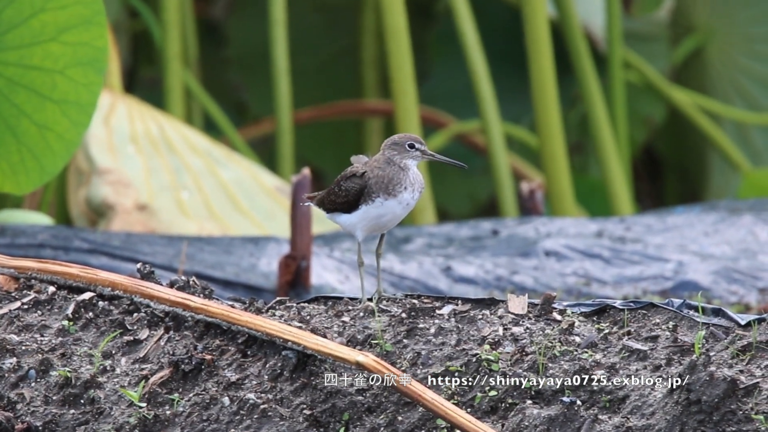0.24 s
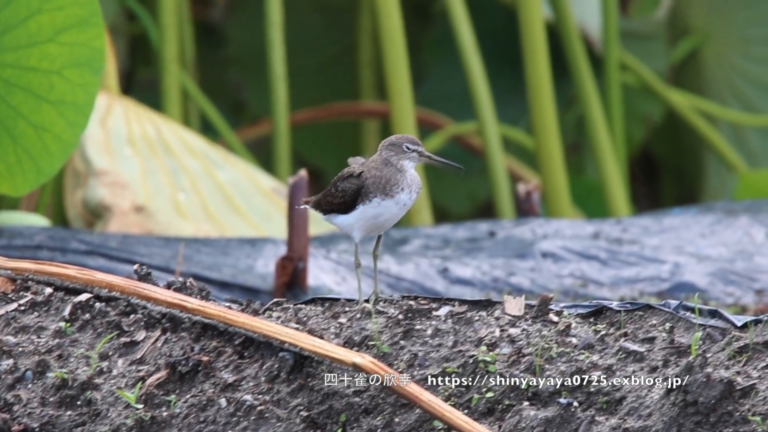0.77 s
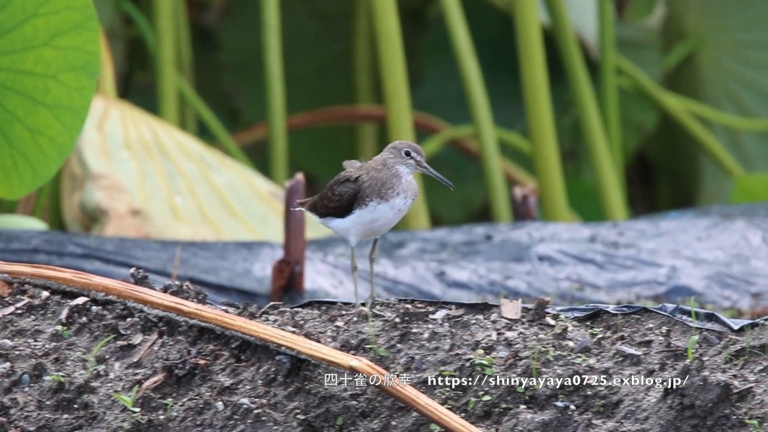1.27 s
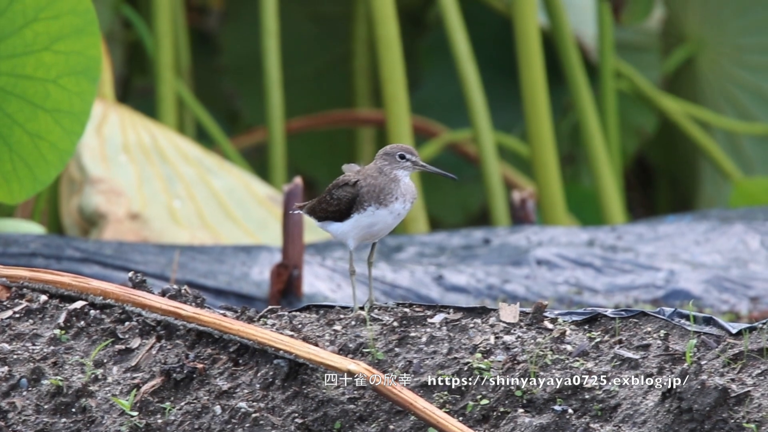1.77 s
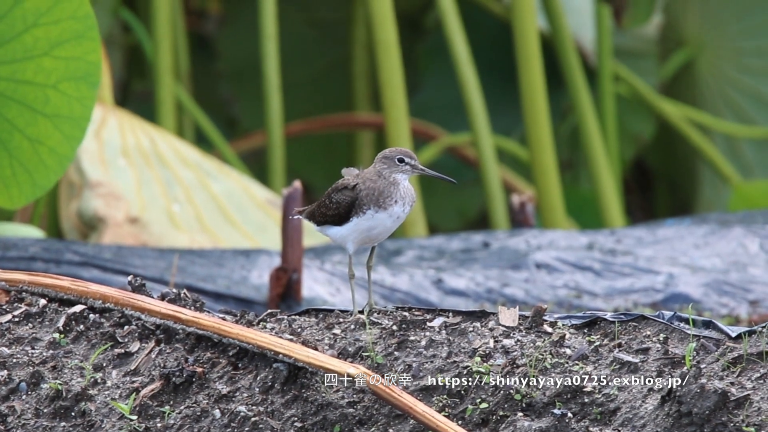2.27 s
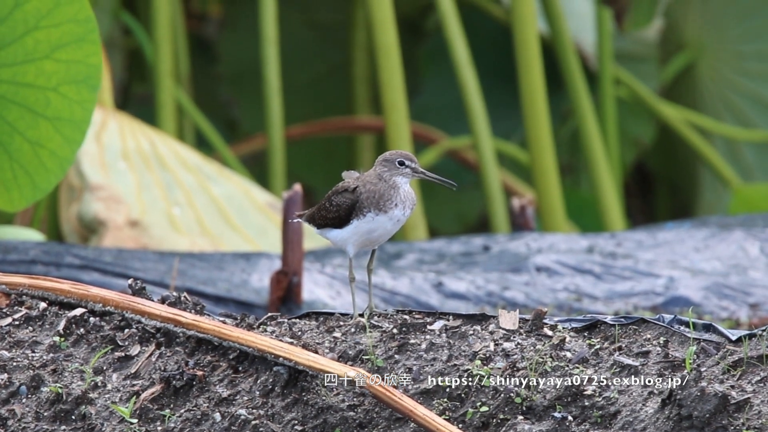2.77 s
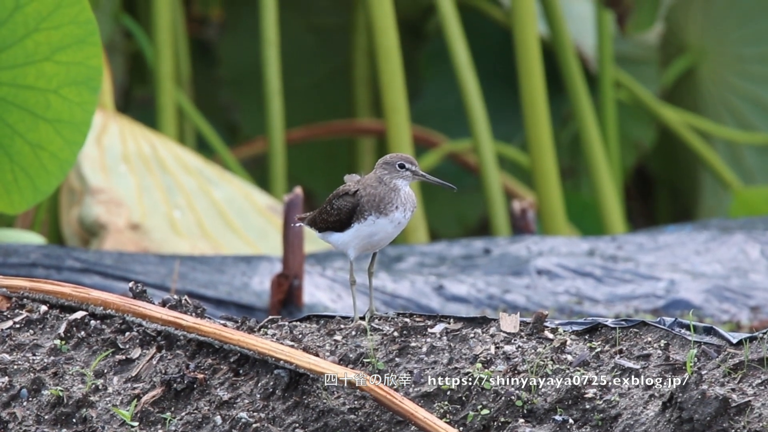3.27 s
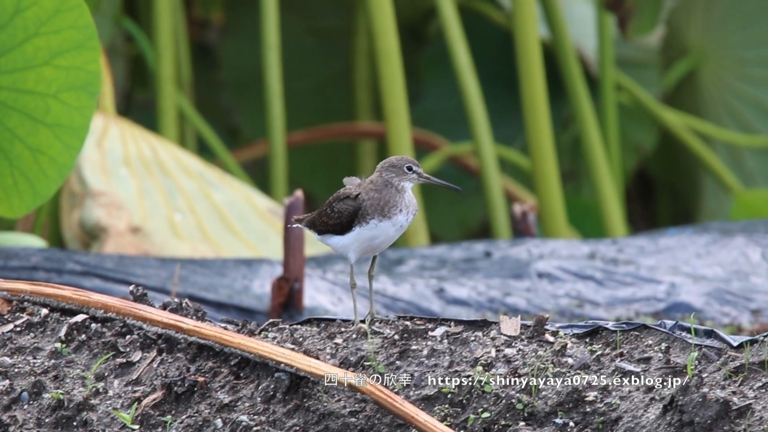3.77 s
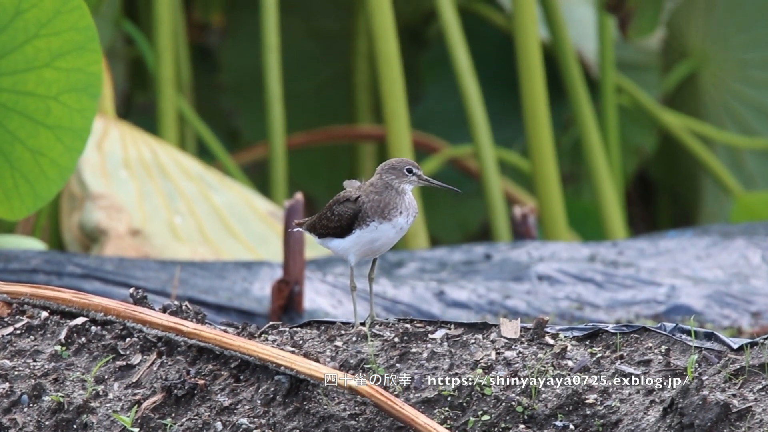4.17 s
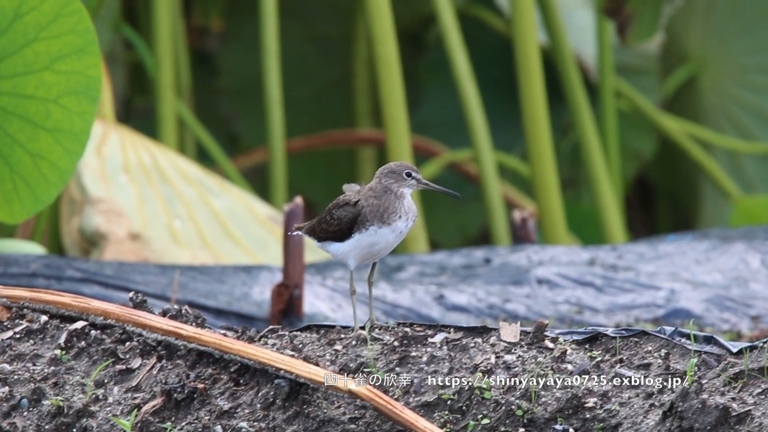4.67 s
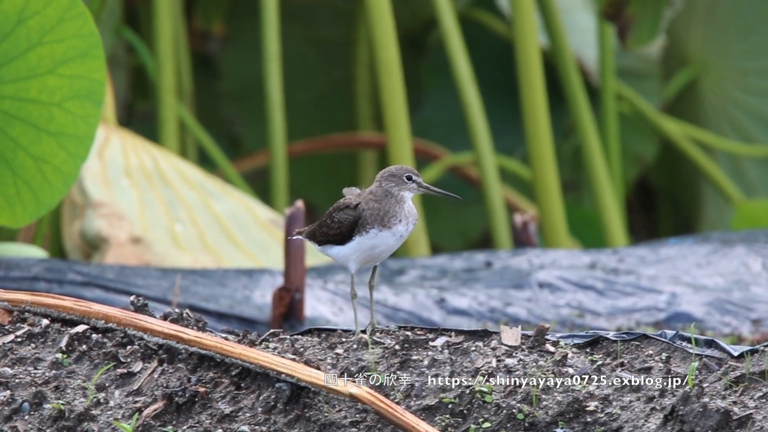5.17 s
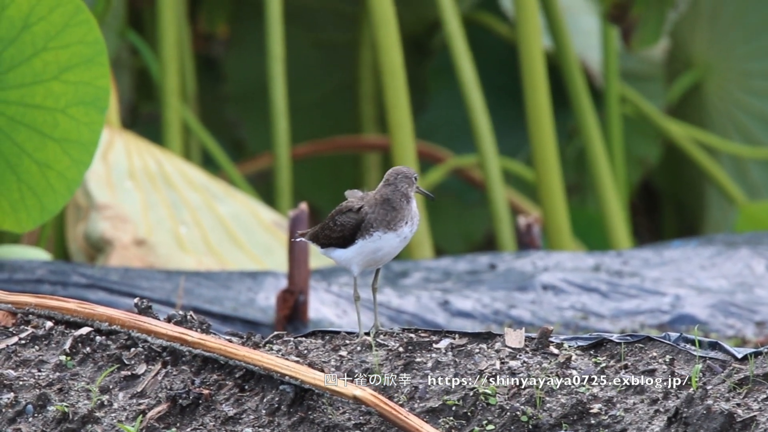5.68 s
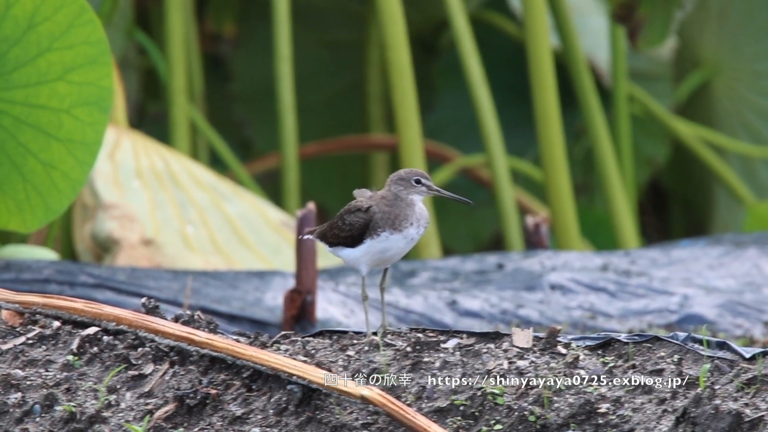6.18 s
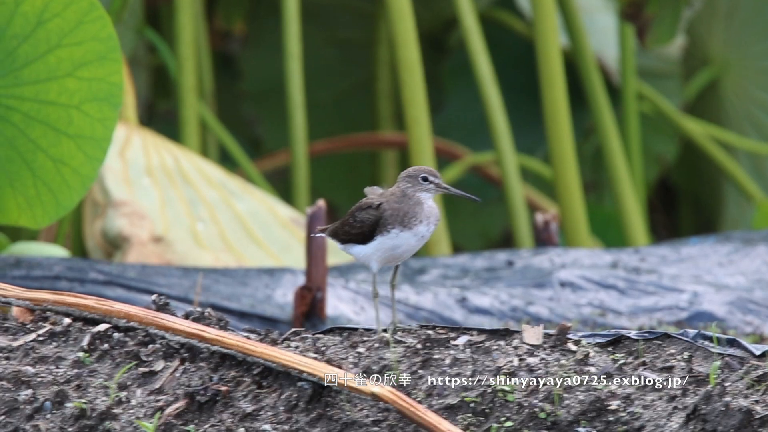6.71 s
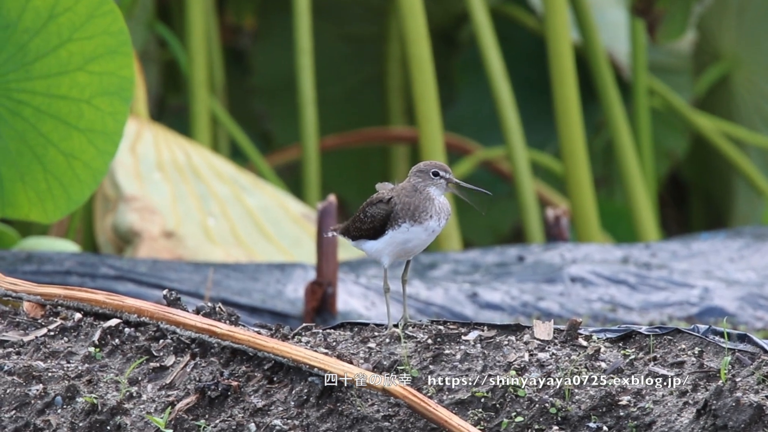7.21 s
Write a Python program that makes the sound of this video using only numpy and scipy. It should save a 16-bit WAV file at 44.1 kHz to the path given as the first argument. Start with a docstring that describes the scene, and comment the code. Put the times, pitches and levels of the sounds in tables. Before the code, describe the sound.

Sharp, evenly spaced calls from a wading bird, with distant cicadas and low, irregular wind gusts buffeting the microphone.

```python
"""A sandpiper pipes runs of sharp, arched notes at the edge of a lotus field; its throat favours
the second partial, and the stems scatter a short tail. Far off, a cicada repeats a hoarse whine
and a hiss, and a small bird twitters and buzzes once. Wind rises and buffets the microphone in
low, irregular thumps. Under it all lies a steady bed of outdoor hush, insects and faint motor hum."""
import sys
import numpy as np
from scipy import signal
from scipy.fft import rfft, irfft, next_fast_len
from scipy.io import wavfile
from scipy.ndimage import uniform_filter1d, map_coordinates

SR = 44100
rng = np.random.default_rng(int(sys.argv[2]) if len(sys.argv) > 2 else 0)


def transcribe(signal):
    """Save signal, clipped to [-1, 1], as a 16-bit WAV file at the path in sys.argv[1]."""
    frames = np.atleast_2d(signal).T
    limited = np.clip(frames, -1, 1)
    pcm = np.round(limited * 32767).astype(np.int16)
    wavfile.write(sys.argv[1], SR, pcm)


N = 328528
TOP_HZ = 15848  # band limit of the mix

# colour of the outdoor bed: f/Hz, relative level/dB
HUSH_COLOUR = [(20, -19), (47, 0), (70, -5.5), (105, -2.5), (160, -10), (290, -10.5), (780, -15),
               (3000, -21.5), (4250, -27), (5200, -26.5), (7000, -29), (11000, -38.5), (15800, -40.5)]
# stereo image of the bed: f/Hz, left-right likeness/ratio
HUSH_LIKENESS = [(60, 0.82), (180, 0.93), (550, 0.6), (1650, -0.36), (4970, -0.36), (15000, 0.11)]
# far insects singing without pause: f/Hz, width/Hz, level/dB
INSECT_BANDS = [(5230, 230, -57.5)]

# cicada phrases, cued where the whine turns to hiss: t/s, relative whine level/dB, hiss level/dB
CICADA_PHRASES = [(1.034, -42, -49), (2.39, -42, -50.5), (3.688, -40, -48.5), (5.04, -42.5, -54),
                  (6.323, -39, -48)]
# pitch bend of the whine, timed from the turn: t/s, f/Hz
WHINE_BEND = [(-.2, 2020), (-.07, 1782), (-.03, 1850), (-.018, 2150), (-.005, 2700), (.01, 2850)]
# partials of the whine: f/fundamental, relative level/dB
WHINE_PARTIALS = [(1, 3), (2, -.5)]
# pitched lines in the hiss: f/fundamental, relative level/dB
HISS_LINES = [(2, -6), (5, -4), (7, -9)]
# colour of the cicada's rasp: f/Hz, relative level/dB
RASP_COLOUR = [(2400, -20), (2900, -6), (3400, -6.5), (4500, -12), (5800, -6.5), (7300, -6), (8300, -19),
               (10000, -27)]
# colour of its hiss: f/Hz, relative level/dB
HISS_COLOUR = [(5000, -14), (7000, -11), (8600, 9), (9500, -1), (11000, -5), (13200, -1), (15800, -8)]
# more cicadas rasping further off: t/s, level/dB
CHORUS_SWELL = [(1.8, -66), (2.3, -61), (3.3, -46), (3.9, -60), (5.4, -52.5), (7.4, -53)]

# small bird's slurs: t/s, length/s, start f/Hz, middle f/Hz, end f/Hz, relative level/dB
TWITTER_SLURS = [(0.474, 0.012, 5100, 5280, 5100, -45), (0.492, .015, 3600, 4780, 4500, -39),
                 (0.513, 0.015, 3580, 4450, 4600, -38), (0.529, 0.02, 3350, 4020, 4750, -43),
                 (.595, .037, 5530, 5420, 4900, -40), (0.633, 0.025, 4880, 4280, 3950, -37),
                 (.66, 0.021, 3750, 3180, 3000, -47), (.684, .008, 4550, 4160, 3800, -40),
                 (0.691, .026, 3860, 3600, 2900, -43.5)]

# light breeze between the gusts: t/s, relative rumble level/dB
BREEZE_SWELL = [(1.9, -73), (2.1, -46), (2.5, -38.5), (3.6, -40), (4.1, -20), (4.4, -29), (4.62, -37),
                (4.78, -39), (5.05, -22), (5.4, -26), (5.64, -32), (6.05, -25.5), (6.35, -30.5), (6.6, -29),
                (6.95, -23), (7.24, -32.5), (7.45, -38)]
# gusts on the microphone: t/s, hold/s, relative rumble level/dB, relative flutter level/dB, pan left/dB
GUST_CUES = [(2.647, 0.021, -26, -40, 19), (2.737, 0.15, -28.5, -33.5, 16), (2.946, 0.081, -26.5, -35, -14),
             (3.09, 0.0076, -19.5, -47, 27), (3.228, 0.16, -30.5, -45, 24), (3.438, 0.018, -23, -42, 18),
             (3.548, 0.088, -23, -37.5, -10.5), (3.741, 0.11, -24, -56, 29),
             (3.856, 0.078, -15.5, -21.5, 17), (3.927, 0.071, -17, -23.5, 10.5),
             (4.184, 0.094, -20.5, -31, -5.5), (4.282, 0.033, -21.5, -18, 4), (4.336, 0.042, -16, -36, -4),
             (4.476, 0.046, -20.5, -29, 3.5), (4.83, 0.034, -21, -32, 6.5), (4.91, 0.082, -17.5, -45, 7),
             (5.088, 0.2, -16, -21.5, 5), (5.32, 0.061, -16, -21.5, 5), (5.416, 0.055, -20, -19.5, 3),
             (5.566, 0.0079, -18, -18.5, 3), (5.729, 0.015, -17, -21, 3), (5.81, 0.052, -19.5, -16, 3),
             (5.912, 0.09, -20, -27, 3), (6.134, 0.028, -15.5, -23, 1), (6.396, 0.012, -22, -23.5, 4.5),
             (6.473, 0.02, -13, -17.5, 3.5), (6.665, 0.031, -19, -17.5, -1.5),
             (6.758, 0.015, -13, -14.5, 6.5), (6.839, 0.08, -23.5, -19, -2.5), (6.938, 0.014, -29, -23, -6),
             (7.066, 0.12, -32, -35, -10), (7.3, 0.083, -24.5, -37, -3), (7.438, .02, -18.5, -29, 0)]
# colour of the wind's low rumble: f/Hz, relative level/dB
RUMBLE_COLOUR = [(20, -6), (32, -12), (45, -5), (75, -1), (120, 3), (200, 1), (260, -8), (340, -26.5),
                 (500, -26.5), (900, -92)]
# colour of its low-mid flutter: f/Hz, relative level/dB
FLUTTER_COLOUR = [(130, -44), (220, -5), (290, -4), (400, -10.5), (520, -25), (700, -24), (1100, -76)]
# colour of the sputter in hard gusts: f/Hz, relative level/dB
SPUTTER_COLOUR = [(300, -12), (470, 1), (630, -4), (800, -8), (1100, -9), (1600, -21), (3000, -70)]
# the wind's deepest bass against the rest of its rumble: t/s, level/dB
BASS_RIDE = [(2.6, 9), (3.6, 6), (4.3, -8), (4.7, 10.5), (5.4, -2), (5.7, -17), (6.3, 1), (6.7, -31),
             (7.3, 0)]
# thumps of the strongest eddies: t/s, relative level/dB, nominal f/Hz
EDDY_HITS = [(2.669, -8.5, 218), (3.096, -3.5, 158), (3.234, -15, 188), (3.343, -14.5, 176),
             (3.447, -15.5, 150), (3.862, -0.5, 280), (3.878, -4.5, 350), (3.893, -9, 250),
             (3.947, -9, 280), (3.959, -2, 200), (3.982, -2.5, 290), (4.002, -4, 200), (4.238, -7, 210),
             (4.247, -5, 173), (4.281, -4, 210), (4.29, -2.5, 186), (4.3, 2, 390), (4.306, 1.5, 303),
             (4.316, 0.5, 220), (4.518, -8, 260), (4.855, -13, 218), (4.938, -9, 169), (4.983, -2, 148),
             (4.993, -6.5, 199), (5.111, -3.5, 219), (5.128, 1, 286), (5.256, -1, 210), (5.316, -3, 156),
             (5.326, -1.5, 256), (5.362, 1.5, 264), (5.366, -0.5, 245), (5.378, -3, 560), (5.453, -6, 260),
             (5.462, 3, 307), (5.58, -8, 258), (5.741, 0, 151), (5.749, 0.5, 180), (5.77, -5, 256),
             (5.814, 1.5, 315), (5.821, -3, 360), (5.846, -8, 540), (5.855, -1, 306), (5.87, -4.5, 600),
             (5.905, 5, 340), (5.921, -4.5, 200), (6.4, -3, 300), (6.477, -3.5, 260), (6.486, 1, 303),
             (6.511, -7.5, 370), (6.532, -9, 303), (6.756, 9.5, 345), (6.768, -1, 360), (6.789, 0.5, 247),
             (6.81, -3, 256), (6.862, -13, 480), (6.895, -4.5, 304), (6.955, -6.5, 230), (7.065, -7, 196),
             (7.114, -5, 178)]

# sandpiper notes: t/s, relative level/dB, top f/Hz, onset accent/dB
PIPING_NOTES = [(.2284, -20.5, 2735, 6.5), (0.555, -20, 2746, 5), (0.8542, -19, 2747, 3),
                (1.153, -18.5, 2783, 4.5), (1.449, -18.5, 2767, 4.5), (1.7533, -19, 2782, 6),
                (2.5381, -18.5, 2762, 3), (2.845, -19.5, 2743, 3), (3.1505, -19.5, 2726, 4.5),
                (3.4643, -20, 2750, 6), (3.777, -20.5, 2762, 4.5), (4.0731, -20, 2820, 8),
                (4.370, -21, 2823, 5), (4.665, -19.5, 2787, 6.5), (4.953, -18, 2777, 5),
                (5.2512, -19, 2740, 4.5), (5.559, -20.5, 2730, 0), (5.874, -20.5, 2770, 0),
                (6.161, -18, 2844, 5.5), (6.4517, -19, 2823, 5), (6.725, -20, 2824, 8.5),
                (7.016, -18, 2805, 5.5), (7.315, -18.5, 2766, 5)]
# pitch arch of every note: stage (0 start, 1 top, 2 end), f/top pitch
NOTE_ARCH = [(0, .72), (.13, .62), (.25, .84), (.4, .892), (.64, .94), (.76, .988), (1, 1), (1.2, .97),
             (1.65, .77), (2, .66)]
# the octave dims where its pitch crosses about 5.2 kHz, once on the way up and again on the way down: stage,
# relative level/dB
OCTAVE_VOICING = [(.1, -1), (.58, -.5), (.69, -3.5), (.8, 2.5), (1, .8), (1.32, -4.5), (1.55, -1.5),
                  (2, -6)]
# upper partials of the note: f/fundamental, relative level/dB
UPPER_PARTIALS = [(3, -12.5), (4, -24), (5, -39)]
# peaks and notches in the brightness of the upper partials: f/Hz, relative level/dB
UPPER_COLOUR = [(5600, -10), (6900, -9), (7350, 2), (7750, 2), (8100, -12), (9400, -4), (10500, -2),
                (11200, -17), (14000, 11)]


def amp(db):
    """Decibels to gain."""
    return 10 ** (np.asarray(db) / 20)


def unit(x):
    """x at rms 1."""
    return x / np.sqrt(np.mean(x ** 2) + 1e-20)


def along(points, hz):
    """A curve of (f/Hz, value) points, read on a log frequency axis."""
    f, v = np.transpose(points)
    return np.interp(np.log(hz + 1), np.log(f + 1), v)


def curves(rows, t):
    """Automation lanes: each column after the first, read at positions t."""
    s, *cols = np.transpose(rows)
    return [np.interp(t, s, c) for c in cols]


def wobble(rate, size):
    """A smooth random curve, rate knots a second."""
    knots = rng.standard_normal(int(size * rate / SR) + 4)
    return map_coordinates(knots, [np.arange(size) * rate / SR])


def envelope_db(t, hold, attack, release):
    """0 dB from time 0 through the hold; attack and release are seconds per 20 dB."""
    return -20 * (np.maximum(-t, 0) / attack + np.maximum(t - hold, 0) / release)


def filtered(x, response):
    """EQ x with a gain that is a function of frequency."""
    size = next_fast_len(N + 8192)
    return irfft(rfft(x, size) * response(np.fft.rfftfreq(size, 1 / SR)), size)[..., :N]


def noise(colour, likeness):
    """Stereo noise of rms 1 with a given colour and left-right likeness."""
    def mid_side_eq(hz):
        width = np.arccos(np.clip(along(likeness, hz), -1, 1)) / 2
        return amp(along(colour, hz)) * [np.cos(width), np.sin(width)]
    mid, side = filtered(rng.standard_normal((2, N)), mid_side_eq)
    return unit(np.array([mid + side, mid - side]))


def phase_of(hz):
    """Running phase of a gliding pitch."""
    return 2 * np.pi * np.cumsum(hz) / SR


def panned(x, pan_db):
    """x with the left side pan_db above the right."""
    return x * amp([[pan_db / 2], [-pan_db / 2]])


def add(track, s, x):
    """Mix x into the stereo track from time s."""
    i = max(round(s * SR), 0)
    track[:, i:i + x.shape[1]] += x[:, :max(N - i, 0)]


def scattered(x, wet_db, t60, early_db=0, early_t60=.016):
    """Mono x plus its stereo echo: a quick spray from nearby stems and a longer one from the field."""
    t = np.arange(SR // 2) / SR
    build_up = 1 - np.exp(-t / .0043)
    decay = (amp(-60 * t / t60) + amp(early_db - 60 * t / early_t60)) * build_up
    impulse = rng.standard_normal((2, len(t))) * decay / np.linalg.norm(decay) * amp(wet_db)
    impulse[:, 0] += 1  # direct sound
    return signal.fftconvolve(x[None], impulse, axes=1)


def hush():
    """The bed: far outdoor noise with insects and a faint motor hum in it."""
    air = amp(-35 + .37 * wobble(1.28, N)) * noise(HUSH_COLOUR, HUSH_LIKENESS)
    for centre_hz, width_hz, db in INSECT_BANDS:
        band = lambda hz: 1 / (1 + ((hz - centre_hz) / width_hz * 2) ** 2)
        air += amp(db) * unit(filtered(rng.standard_normal((2, N)), band))
    hum = amp(-49.5 + 1.2 * wobble(6, N)) * np.sin(phase_of(787 + 5 * wobble(40, N)))
    return panned(air + hum, pan_db=1.5)


def hoarse(hz, partials, rough, reach_hz):
    """A far, rough tone: pitch jitters, partials flutter on each side, and highs fade past reach_hz."""
    flutter = lambda: np.array([wobble(170, len(hz)) for side in range(2)])
    phase = phase_of(hz * (1 + rough * wobble(600, len(hz))))
    tone = 0
    for k, db in partials:
        gain = amp(db) / (1 + (k * hz / reach_hz) ** 12)
        fading = .75 + .47 * (flutter() + 1j * flutter())
        tone += gain * np.real(fading * np.exp(1j * round(k) * phase))
    return tone


def cicada():
    """Each phrase rasps, sags into a hoarse whine that flicks up, and lets go in a high hiss."""
    out, rasp_gain, hiss_gain = np.zeros((3, 2, N))
    t = np.arange(-.5, .45, 1 / SR)
    # whine and rasp swell towards the turn at t = 0, where the hiss takes over
    whine_env_db = -1.5 + envelope_db(t + .072, hold=.072, attack=.11, release=.018)
    rasp_env_db = -2 + envelope_db(t + .029, hold=.026, attack=.38, release=.031)
    hiss_env_db = envelope_db(t - .015, hold=.17, attack=.04, release=.13)
    whine_hz, = curves(WHINE_BEND, t)
    hiss_hz = 1965 - 300 * np.exp(-np.maximum(t, 0) / .037)  # starts low and slides up again
    for turn_s, whine_db, hiss_db in CICADA_PHRASES:
        start_s = turn_s + t[0]
        whine = hoarse(whine_hz, WHINE_PARTIALS, rough=.042, reach_hz=4500)
        hiss_tone = hoarse(hiss_hz, HISS_LINES, rough=.02, reach_hz=TOP_HZ)
        add(out, start_s, amp(whine_db + whine_env_db) * whine)
        add(out, start_s, amp(hiss_db + hiss_env_db) * hiss_tone)
        add(rasp_gain, start_s, amp(whine_db + rasp_env_db)[None])
        add(hiss_gain, start_s, amp(hiss_db + hiss_env_db + wobble(134, len(t)))[None])
    chorus_gain = amp(curves(CHORUS_SWELL, np.arange(N) / SR)[0] + 2 * wobble(6, N))
    rasp = np.hypot(rasp_gain, chorus_gain) * noise(RASP_COLOUR, likeness=[(6000, .14)])
    hiss = hiss_gain * noise(HISS_COLOUR, likeness=[(10000, .12)])
    return out + rasp + hiss


def small_bird_twitter():
    """Quick, distant slurs, each a wavering whistle bent through three pitches."""
    out = np.zeros((2, N))
    for s, length, start_hz, middle_hz, end_hz, db in TWITTER_SLURS:
        progress = np.linspace(0, 1, int(length * SR))
        hz = np.polyval(np.polyfit([0, .5, 1], [start_hz, middle_hz, end_hz], 2), progress)
        waver = wobble(430, len(progress))
        slur = amp(db + 2 + 2.5 * waver) * np.sin(phase_of(hz * (1 + .015 * waver)))
        fade = np.sqrt(np.abs(np.sin(np.pi * progress)))
        add(out, s, scattered(slur * fade, wet_db=-7, t60=.16))
    return out


def small_bird_buzz():
    """One falling tone, swung fast up and down and loudest at the bottom of each swing."""
    start_s, start_hz, sag_hz_per_s, swing_hz, rate_hz = 6.892, 6330, 6900, 673, 100
    out, t = np.zeros((2, N)), np.arange(-.02, .12, 1 / SR)
    db = -38 + envelope_db(t, hold=.075, attack=.013, release=.04)
    swing = np.sin(phase_of(rate_hz * (1 + .04 * wobble(41, len(t)))))
    hz = start_hz - sag_hz_per_s * t + swing_hz * swing
    buzz = amp(db - 7.1 * swing) * np.sin(phase_of(hz))
    add(out, start_s + t[0], scattered(buzz, wet_db=-3, t60=.15))
    return out


def airflow(t):
    """Gusts pile onto the breeze: rumble, flutter and pan in dB; the hardest gust leads the pan."""
    rumble = amp(curves(BREEZE_SWELL, t)[0]) ** 2
    flutter, weighted_pan = rumble * amp(-13) ** 2, np.zeros(N)
    for s, hold, rumble_db, flutter_db, pan_db in GUST_CUES:
        near = slice(*np.searchsorted(t, [s - .2, s + hold + .3]))
        power = amp(envelope_db(t[near] - s, hold, attack=.015, release=.043)) ** 2
        rumble[near] += power * amp(rumble_db) ** 2
        flutter[near] += power * amp(flutter_db) ** 2
        weighted_pan[near] += power * amp(rumble_db) ** 2 * pan_db
    return 10 * np.log10(rumble), 10 * np.log10(flutter), weighted_pan / rumble


def turbulence(colour, likeness, smooth_s):
    """Pressure noise, levelled over spans longer than smooth_s."""
    pressure = noise(colour, [(200, likeness)])
    power = uniform_filter1d(np.mean(pressure ** 2, axis=0), int(smooth_s * SR))
    return pressure / np.sqrt(np.abs(power) + .078)


def eddies():
    """Single thumps: an eddy's core sucks sharply, between two pushes of unequal strength."""
    out, half_s = np.zeros((2, N)), .015
    t = np.arange(-half_s, half_s, 1 / SR)
    for s, db, hz in EDDY_HITS:
        u = 1.35 * np.pi * hz * t
        lean = .3 + .46 * rng.standard_normal()  # how far the second push outweighs the first
        thump = (1 - 2 / np.cosh(u) ** 2 + lean * np.tanh(u) / np.cosh(u)) / np.cosh(u)
        add(out, s - half_s, amp(db - 1.5) * thump[None])
    return out


def windward(pressure, pan_db, t):
    """The microphone's windward port gets the pressure louder and sooner."""
    port_db = pan_db * np.array([[1], [-1]])
    lead_s = .0002 * np.tanh(port_db / 2)
    shifted = [np.interp(t + dt, t, port) for dt, port in zip(lead_s, pressure)]
    gain = amp(port_db / 2)
    return gain / np.sqrt(np.mean(gain ** 2, axis=0)) * shifted


def wind():
    """Gusts rumble and flutter on the microphone; hard ones sputter, and single eddies thump."""
    t, bass_edge_hz = np.arange(N) / SR, 93
    rumble_db, flutter_db, pan_db = airflow(t)
    puff_db = .5 + 4 * np.tanh(2 * wobble(42, N))  # the flow swells and slackens in quick puffs
    sputter_db = 1.98 * (flutter_db + puff_db) - 3.5  # the bright part grows faster than the gust
    rumble = amp(rumble_db - 2 + puff_db) * turbulence(RUMBLE_COLOUR, likeness=.95, smooth_s=.0465)
    flutter = amp(flutter_db - 1.5 + puff_db) * turbulence(FLUTTER_COLOUR, likeness=.62, smooth_s=.02)
    sputter = amp(sputter_db) * turbulence(SPUTTER_COLOUR, likeness=.43, smooth_s=.15)
    bass = filtered(rumble, lambda hz: 1 / (1 + (hz / bass_edge_hz) ** 6))
    rumble = rumble - bass + bass * amp(curves(BASS_RIDE, t)[0])
    return windward(rumble + flutter + sputter + eddies(), pan_db, t)


def sandpiper_note(db, top_hz, accent_db):
    """A note flicks up, steps to its top and falls; the throat favours the second partial."""
    t = np.arange(int(.065 * SR)) / SR
    top_s = .0243 + (top_hz - 2750) * .000026  # higher notes climb for longer
    end_s = top_s + .025 + .0015 * rng.standard_normal()
    stage = np.interp(t, [0, top_s, end_s], [0, 1, 2])
    arch, = curves(NOTE_ARCH, stage)
    hz = top_hz * arch * (1 + .0037 * wobble(480, len(t)))
    phase = phase_of(hz)
    root = amp(-15 - 294 * (1 - arch) ** 2) * np.sin(phase)  # speaks only near the top of the arch
    fall_db = 3.5 * rng.standard_normal() * np.maximum(stage - 1, 0)  # each fall has its own weight
    octave = amp(curves(OCTAVE_VOICING, stage)[0] + fall_db) * np.sin(2 * phase)
    upper = sum(amp(level + along(UPPER_COLOUR, k * hz)) * np.sin(round(k) * phase)
                for k, level in UPPER_PARTIALS)
    # the upper partials belong to the upstroke and fade first
    upper *= amp(envelope_db(t - .0095, hold=.006, attack=.0095, release=.03))
    overtone_db = -3.5 + envelope_db(t - .0072, hold=.018, attack=.0072, release=.046)
    overtone_gain = amp(overtone_db + .58 * wobble(446, len(t)))
    gate = np.clip(np.minimum(t / .002, (end_s - t) / .004 + .5), 0, 1)
    # every note opens with a quick flick, weaker when the accent is soft
    push = gate * amp(db + 1 + accent_db * np.clip(1 - t / .02, -.4, .6))
    body = push * (overtone_gain * octave + root)
    edge = push * overtone_gain * upper
    return (scattered(body, wet_db=-6.3, t60=.38, early_db=4, early_t60=.11)
            + scattered(edge, wet_db=-7.5, t60=.3))


def sandpiper():
    """The lead voice: runs of piped notes, left of centre."""
    out = np.zeros((2, N))
    for s, db, top_hz, accent_db in PIPING_NOTES:
        add(out, s, sandpiper_note(db, top_hz, accent_db))
    return panned(out, pan_db=5)


def scene():
    """The sandpiper over the small bird, cicada, wind and hush."""
    return sandpiper() + small_bird_twitter() + small_bird_buzz() + cicada() + wind() + hush()


def record(dry):
    """The microphone sheds the deepest bass, clips the hardest thumps and cuts off at the band limit."""
    low_cut_hz = 32
    thinned = filtered(dry, lambda hz: hz ** 3 / np.sqrt(hz ** 6 + low_cut_hz ** 6))
    return filtered(np.clip(thinned, -.98, .98), lambda hz: hz < TOP_HZ)


dry = scene()
out = record(dry)
transcribe(out)
```